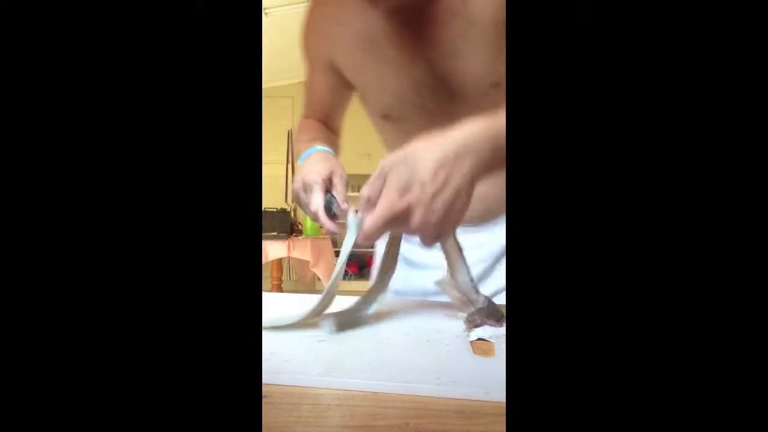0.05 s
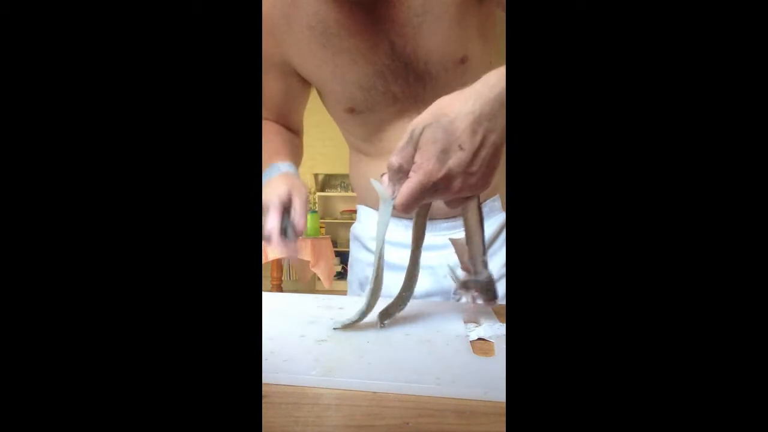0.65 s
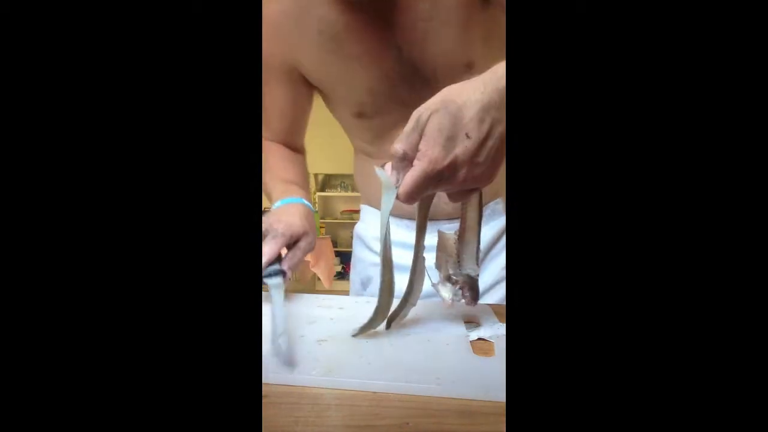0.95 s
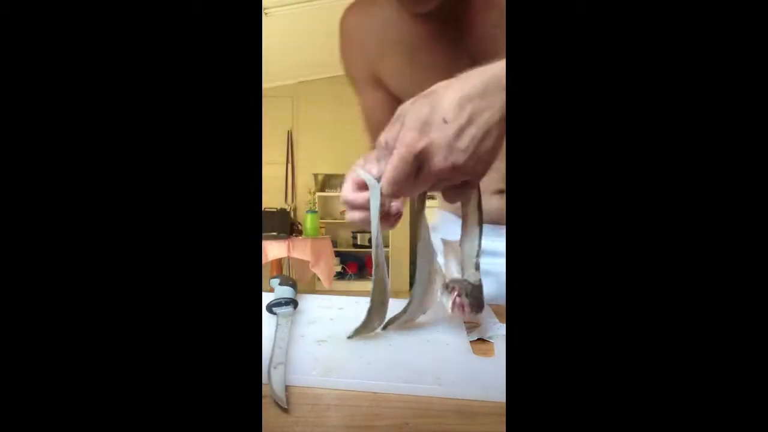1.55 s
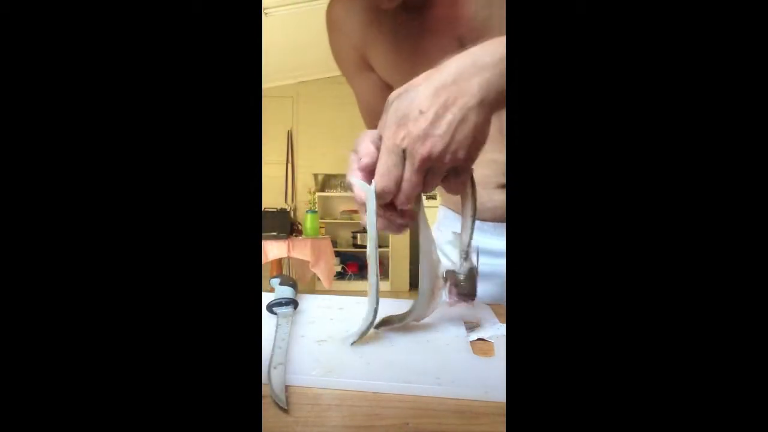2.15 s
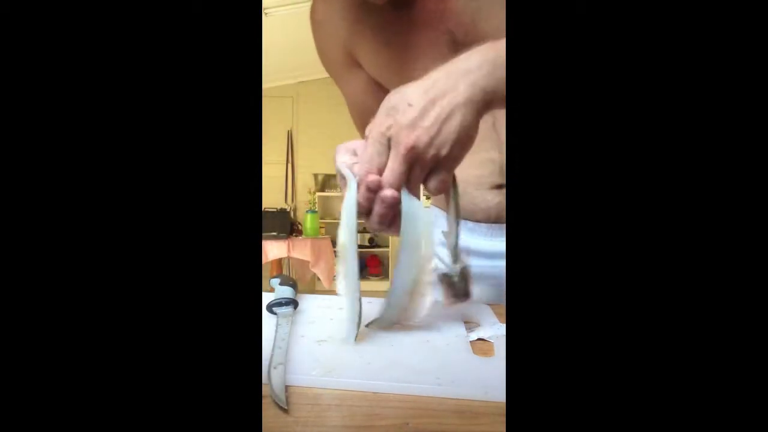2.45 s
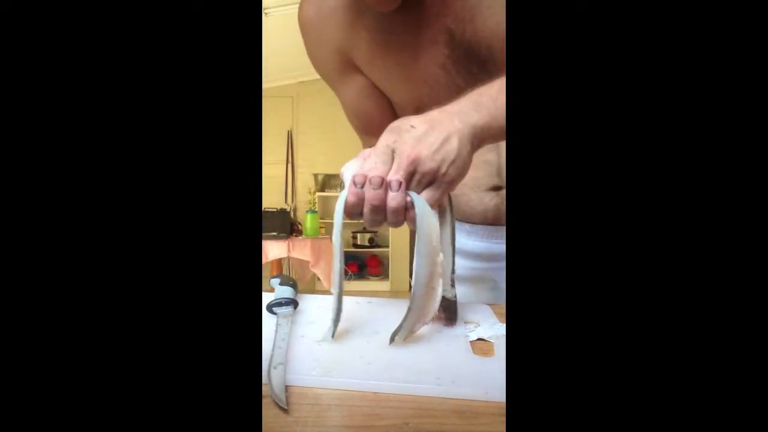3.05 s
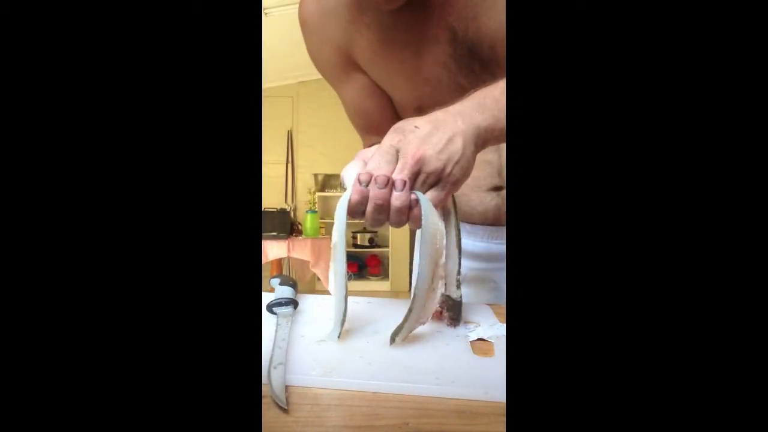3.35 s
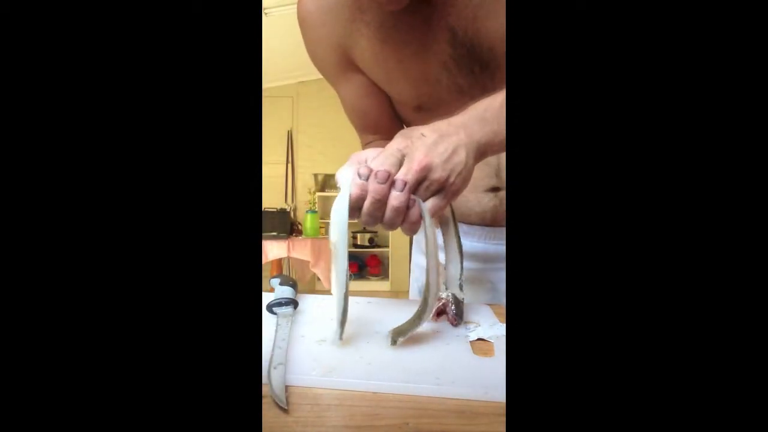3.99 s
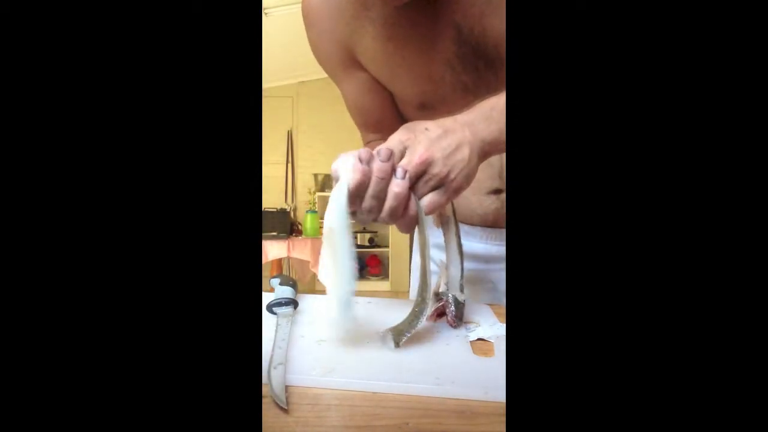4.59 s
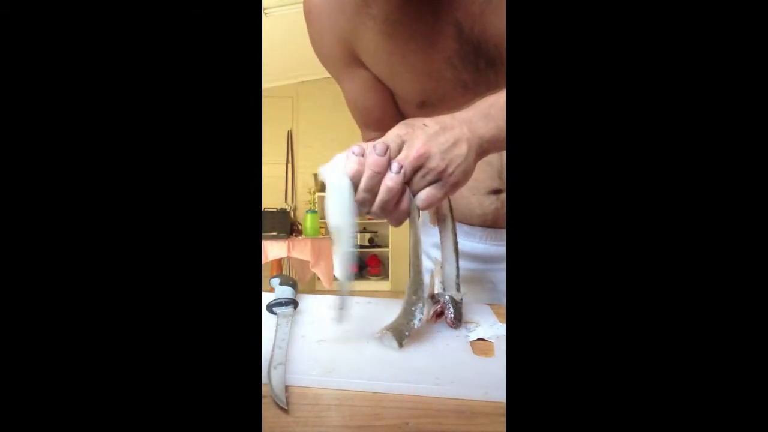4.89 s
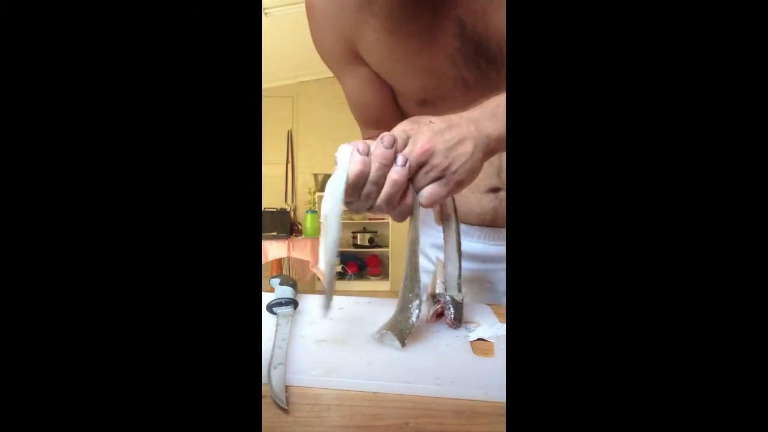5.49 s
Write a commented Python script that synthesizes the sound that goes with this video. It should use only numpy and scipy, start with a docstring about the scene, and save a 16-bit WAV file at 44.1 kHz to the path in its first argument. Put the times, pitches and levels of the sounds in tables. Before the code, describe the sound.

A knife ticks and knocks loudly onto a plastic board, then raw squid peels with soft wet pops over a faint fan hum.

```python
"""A fan hums in a small kitchen as raw squid peels wetly apart over a plastic cutting board.
A knife is laid down: after a few light knocks its blade ticks on the board, then the handle drops
with a loud, chattering knock and a dull thud, and the phone's gain ducks. The hands pull on:
tiny wet films break in a crackle, bigger ones snap, and the air pockets behind them ring."""
import sys
import numpy as np
from scipy import signal
from scipy.fft import rfft, irfft
from scipy.io import wavfile
from scipy.ndimage import uniform_filter1d

SR = 44100
rng = np.random.default_rng(int(sys.argv[2]) if len(sys.argv) > 2 else 0)


def wrap_up_sound(samples):
    """Save the sound to the file named by the first command line argument, as 16-bit audio."""
    columns = np.atleast_2d(samples).T
    # keep every value between -1 and 1, then stretch to whole-number steps
    tamed = np.clip(columns, -1, 1)
    steps = np.round(tamed * 32767).astype(np.int16)
    wavfile.write(sys.argv[1], SR, steps)


N = 248283
T = np.arange(N) / SR
TOP_HZ = 15500


def undb(db):
    """Decibels to gain."""
    return 10 ** (np.asarray(db) / 20)


def unit(x):
    """Scale to rms 1."""
    return x / np.sqrt(np.mean(x ** 2))


def through(x, response):
    """Play a sound through an impulse response."""
    return signal.fftconvolve(x, response)[:N]


def decay(t, t60):
    """Envelope that falls 60 dB in t60."""
    return np.exp(-np.log(1000) * t / t60)


def colour(points, size=4096):
    """Minimum-phase response of unit energy, shaped by an EQ curve of (Hz, dB) points."""
    hz, db = np.transpose(points)
    bins = np.maximum(np.fft.rfftfreq(size, 1 / SR), 1)
    cepstrum = irfft(np.log(undb(np.interp(np.log(bins), np.log(hz), db))))
    cepstrum[1:size // 2] *= 2
    cepstrum[size // 2 + 1:] = 0
    response = irfft(np.exp(rfft(cepstrum)))
    return response / np.linalg.norm(response)


def ring(modes):
    """Unit-energy response of a struck body: damped sines of alternating sign."""
    t = T[:SR // 2]
    response = sum((-1) ** k * undb(db) * decay(t, t60) * np.sin(2 * np.pi * hz * t)
                   for k, (hz, db, t60) in enumerate(modes))
    return response / np.linalg.norm(response)


def add(track, s, sound):
    """Mix a short sound in at time s."""
    start = max(int(s * SR), 0)
    track[start:start + len(sound)] += sound[:N - start]


def drift(rate):
    """Smooth random modulation, rms 1, with `rate` new values a second."""
    hold = int(SR / rate)
    steps = np.repeat(rng.standard_normal(N // hold + 1), hold)
    return unit(uniform_filter1d(uniform_filter1d(steps, hold), hold)[:N])


def crackle(rate, spread_db):
    """Tiny random clicks of uneven size, about `rate` a second, rms 1."""
    sizes = undb(spread_db * np.minimum(rng.exponential(size=N), 4)) * rng.choice([-1, 1], N)
    return unit(sizes * (rng.random(N) < rate / SR))


# Reverb bands of the room: (frequency [Hz], t60 [s], relative level [dB])
ROOM_BANDS = [(119, .4, -5.5), (261, 0.52, 0.5), (553, 0.31, 3.5), (907, 0.37, 2.5), (1527, 0.38, 0.5),
              (3320, 0.41, 4.5), (4910, .38, 1.5), (7430, 0.32, -4.5), (14400, 0.24, 4)]

def kitchen(x, near_db, far_db, near_t60=0.029):
    """Direct sound, quick scatter from table and hands, and the tail of the room."""
    t = T[:SR * 3 // 4]
    hz, t60s, db = np.transpose(ROOM_BANDS)
    log_bins = np.log(np.maximum(np.fft.rfftfreq(len(t), 1 / SR), 1))
    noise = rfft(rng.standard_normal(len(t)))
    tail = 0
    for share, t60, gain in zip(np.eye(len(hz)), t60s, undb(db)):
        band = irfft(noise * np.interp(log_bins, np.log(hz), share), len(t))
        tail = tail + gain * band * decay(t, t60)
    tail *= np.clip(t / 0.01 - .5, 0, 1)  # fades in from 5 to 15 ms
    scatter = rng.standard_normal(len(t)) * decay(t, near_t60) * (t > .0004)
    near = undb(near_db) * scatter / np.linalg.norm(scatter)
    far = undb(far_db) * tail / np.linalg.norm(tail)
    return x + through(x, near + far)


def motor_tone(hz, db, wander_hz):
    """A motor tone that wavers in pitch and level."""
    amplitude = np.sqrt(2) * undb(db + 0.74 * drift(26))
    pitch = hz + wander_hz * drift(40)
    return amplitude * np.sin(2 * np.pi * np.cumsum(pitch) / SR)


def noise_bed(eq, fader, flicker_db):
    """Coloured noise that follows a fader curve and flickers in level."""
    noise = through(rng.standard_normal(N), colour(eq))
    return noise * undb(np.interp(T, *np.transpose(fader)) + flicker_db * drift(14))


# EQ of the fan's low drone and of its airy rush: (frequency [Hz], relative level [dB])
DRONE_EQ = [(18, -45.5), (30, -15), (80, -26), (117, -8.5), (144, -11), (177, 3), (231, -8.5), (328, -4.5),
            (397, -8.5), (509, -14.5), (644, -14.5), (714, -20.5), (1000, -24), (1300, -63.5), (2200, -120)]
RUSH_EQ = [(400, -11), (900, -7), (1500, 0.5), (2000, -4.5), (2600, -2), (3400, -5), (4500, -4.5),
           (6500, -8), (10000, -10.5), (15500, -16)]
# Fader curves of drone and rush: (time [s], level [dB])
DRONE_FADER = [(0, -57.5), (1.15, -57), (1.5, -66.5), (1.85, -59.5), (2.5, -57), (3.3, -56), (4.2, -55),
               (5.6, -55)]
RUSH_FADER = [(0, -56), (.6, -65.5), (1.2, -59.5), (2, -64), (2.5, -64.5), (5.6, -63)]
# The motor's hum: (pitch [Hz], level [dB], wander [Hz])
MOTOR_TONES = [(177, -70.5, 4.5), (1523, -81, 5), (1796, -84, 2.6), (1920, -84.5, 3.2), (2097, -80.5, 3.7),
               (2310, -81.5, 3), (2530, -85.5, 2.8), (2564, -80, 3), (2703, -78.5, 1.8)]
# Its thin, high whine: (pitch [Hz], level [dB])
WHINE_PARTIALS = [(3984, -83), (4129, -75.5), (4175, -94)]
# The phone's noise reduction dulls and blurs the whine at first, then lets it through steady:
# (time [s], trim [dB], wander [Hz])
WHINE_AUTOMATION = [(1.5, -2.5, 50), (2.1, 0, 3.7)]

def fan():
    """The fan lays down a throbbing drone, a soft rush of air and wavering motor tones."""
    drone = noise_bed(DRONE_EQ, DRONE_FADER, flicker_db=1.0)
    rush = noise_bed(RUSH_EQ, RUSH_FADER, flicker_db=.8)
    hum = sum(motor_tone(hz, db, wander) for hz, db, wander in MOTOR_TONES)
    times, trim_db, wander_hz = np.transpose(WHINE_AUTOMATION)
    whine = sum(motor_tone(hz, db + np.interp(T, times, trim_db), np.interp(T, times, wander_hz))
                for hz, db in WHINE_PARTIALS)
    return drone + rush + hum + whine


def pocket(hz, cycles, glide):
    """A small air pocket rings for a few cycles, rising in pitch as it opens."""
    age = T[:SR // 50] * hz / cycles  # 1 when the ring is 60 dB down
    return decay(age, 1) * np.sin(2 * np.pi * cycles * age * (1 + glide * np.minimum(age, 1)))


def opening_pockets(s, length, hz, rise, count=160, spread_octaves=0.064, spread_db=2):
    """A swarm of air pockets of different sizes, densest at the peak of a pull."""
    side, large, sign = rng.random((count, 3)).T
    wait, detune, size = rng.standard_normal((count, 3)).T
    times = s + np.abs(wait) * length / 2 * np.where(side < rise, -rise, 1 - rise)
    pitches = hz * 2 ** (spread_octaves * detune)
    pitches *= np.where(large < .22, 0.688, 1)  # some pockets are larger and ring lower
    gains = np.sign(sign - .5) * undb(spread_db * size)
    out = np.zeros(N)
    for at, pocket_hz, gain in zip(times, pitches, gains):
        if 0 < at < T[-1]:
            add(out, at, gain * pocket(min(pocket_hz, TOP_HZ), cycles=22, glide=.08))
    return out * np.sqrt(length * SR / 2) / np.linalg.norm(out)


CRACKLE_START_S = 3.2  # the faint, fine crackle of the fingers begins
# Bright EQ of breaking wet films: (frequency [Hz], relative level [dB])
WET_EQ = [(300, -44), (1000, -19), (2000, -10.5), (3300, -5), (5600, -7), (7400, -1.5), (11000, -3.5),
          (13500, 1), (15500, -1.5)]
# Cues of flesh peeling or sliding: (peak time [s], length [s], level [dB], pocket pitch [Hz])
PEEL_CUES = [(0.031, 0.11, -51, 8100), (0.139, 0.13, -52, 9100), (0.314, 0.2, -65, 3580),
             (0.816, 0.19, -69, 8500), (2.734, 0.14, -63.5, 3360), (2.904, 0.071, -69, 3440),
             (3.262, 0.03, -70, 12500), (3.507, 0.12, -65, 7000), (3.723, 0.094, -69, 8550),
             (3.912, 0.044, -62, 11000), (4.105, 0.083, -68, 6460), (4.231, 0.064, -61, 12000),
             (4.356, 0.031, -65, 5860), (4.416, 0.088, -67, 3760), (4.463, 0.026, -57, 12900),
             (4.495, 0.035, -51, 7140), (4.531, 0.045, -55.5, 13800), (4.844, 0.047, -67, 7250),
             (4.923, 0.049, -60, 9000), (5.062, 0.11, -60.5, 13400), (5.256, 0.04, -46.5, 7200),
             (5.362, 0.12, -66, 8500), (5.565, 0.089, -61, 7240)]

def squelch(rise=0.45, finger_db=-72.5, growth_db_per_s=2.5, burst_db=2.5):
    """Peeling flesh breaks tiny films; later the fingers add a faint, growing crackle."""
    wet = colour(WET_EQ)
    working_db = finger_db + growth_db_per_s * (T - CRACKLE_START_S) + burst_db * drift(22)
    out = through(crackle(rate=900, spread_db=3.5), wet) * undb(working_db) * (T > CRACKLE_START_S)
    films = through(crackle(rate=1000, spread_db=4), wet)
    for s, length, db, hz in PEEL_CUES:
        # a pull swells for the `rise` share of its length and dies away over the rest
        from_peak = np.maximum((s - T) / rise, (T - s) / (1 - rise))
        pull = np.exp(-(from_peak / length) ** 2)
        pocket_db = 5.5 - 110 * length  # in a quicker pull the air pockets ring louder
        out += undb(db) * (pull * films + undb(pocket_db) * opening_pockets(s, length, hz, rise))
    return kitchen(out, near_db=0.0, far_db=-5.5)


def push(contact_ms):
    """Force of one contact; a softer one lasts longer and sounds duller."""
    shape = np.exp(-1000 * T[:SR // 100] / contact_ms)
    return shape / shape.sum()


def bend(force, travel_s, at_hz=1065):
    """Bending waves smear a blow: treble arrives first, bass last, and at_hz takes travel_s."""
    hz = np.fft.rfftfreq(N, 1 / SR)
    phase = 4 * np.pi * travel_s * np.sqrt(at_hz * hz)
    return irfft(rfft(force) * np.exp(-1j * phase), N)


SKID_S, SKID_DB = 0.0057, -27  # swell time, level against the blow
CHATTER_GAP_S, GAP_SHRINK = .0027, .85  # first gap, ratio of each gap to the last
REBOUND_DB, REBOUND_SOFTER_MS = -9, 0.04  # change in level and contact time per rebound
# Hits on the board, the loudest being the handle's drop: (time [s], level [dB], contact time [ms])
KNOCK_CUES = [(.416, -30, .06), (.429, -26.5, 0.042), (.446, -29, 0.066), (1.181, -25, .15),
              (1.192, -27.5, 0.13), (1.2466, 9.5, 0.0038), (1.2525, -4, 0.36), (1.383, -13.5, 0.11),
              (1.424, -27, 0.35)]
# Body of the knock: (frequency [Hz], relative level [dB])
BOARD_EQ = [(35, -45.5), (75, -32.5), (140, -14), (230, -8), (320, -24.5), (480, 0.5), (560, -6),
            (670, 0.5), (810, -6.5), (1000, -10), (1230, -5.5), (1520, -1), (2400, -6.5), (2980, -7.5),
            (3340, -4.5), (4120, -7.5), (4800, -7), (5600, -10), (6400, -8.5), (7300, -3.5), (8670, -7.5),
            (10500, -12), (14100, -26), (15500, -32.5)]
# Ring of the board on its table: (pitch [Hz], relative level [dB], t60 [s])
BOARD_RING = [(171, -8.5, .2), (225, -6, .25), (492, 4, 0.14), (618, 3.5, 0.27), (659, 6.5, 0.23),
              (828, 2.5, 0.15), (928, 6, .14), (1054, 1, 0.12), (1271, 6, .12), (1350, 2, .12),
              (1527, 4.5, .1), (1770, -0.5, .12), (2010, -1, 0.32), (2220, -6, .16), (2370, 3, 0.13),
              (2495, 0.5, .22), (3342, 0.5, .15)]

def board_knocks():
    """Each blow skids, lands and chatters on the board, which rings."""
    force = np.zeros(N)
    friction = through(rng.standard_normal(N), push(contact_ms=0.14))
    for s, db, contact_ms in KNOCK_CUES:
        force += friction * undb(db + SKID_DB) * np.exp(-np.abs(s - T) / SKID_S) * (T < s)
        for k in range(4):
            add(force, s, undb(db + k * REBOUND_DB) * push(contact_ms + k * REBOUND_SOFTER_MS))
            s += CHATTER_GAP_S * GAP_SHRINK ** k
    force = bend(force, travel_s=0.0009)
    knock = through(force, colour(BOARD_EQ))
    ringing = undb(-14) * through(force, ring(BOARD_RING))
    return kitchen(knock + ringing, near_db=-0.5, far_db=-2.5)


# Ticks of the edge on the board: (time [s], level [dB])
TICK_CUES = [(0.9324, -5), (0.9397, -9), (0.9585, -16), (0.9633, -12)]
# Colour of a tick: (frequency [Hz], relative level [dB])
BLADE_EQ = [(120, -41), (200, -23.5), (358, -29), (505, 3.5), (620, -14), (798, -17), (980, -12.5),
            (1110, 3), (1350, -20.5), (1600, -1.5), (1780, -8.5), (2100, 4), (2380, -2.5), (2940, -5),
            (3400, -9.5), (5600, -10), (7620, -3), (15500, -6.5)]
# Steely ring of the knife: (pitch [Hz], relative level [dB], t60 [s])
BLADE_RING = [(508, -3.5, .13), (1070, -6.5, .09), (1203, -3, 0.098), (2036, -3.5, .12), (2140, -7.5, .12),
              (2300, 2, 0.14), (2476, -4, 0.1), (2900, 0.5, 0.0806), (6500, -1, .11), (6880, 3, .11),
              (7680, 2.5, 0.21), (10640, -2.5, .09), (11500, -5, .1), (13580, -5, .12)]

def blade_ticks(scrape_lead_s=.0016, scrape_db=-43):
    """The steel edge scrapes and bounces on the board: a quick clatter of ticks and a short ring."""
    taps = np.zeros(N)
    for s, db in TICK_CUES:
        add(taps, s, undb([db]))
    sliding = (T > TICK_CUES[0][0] - scrape_lead_s) & (T < TICK_CUES[-1][0])
    scrape = undb(scrape_db) * sliding * crackle(rate=1400, spread_db=4.5)
    force = bend(taps + scrape, travel_s=0.0014)
    ticks = through(force, colour(BLADE_EQ))
    ringing = undb(-14.5) * through(force, ring(BLADE_RING))
    return kitchen(ticks + ringing, near_db=-2.5, far_db=-6.5, near_t60=0.026)


# Foreground wet pops: (time [s], level [dB], pocket pitch [Hz])
POP_CUES = [(1.2235, -41, 9000), (2.3168, -33.5, 12000), (2.5308, -41.5, 2890), (2.627, -44, 8800),
            (2.7052, -47.5, 3290), (2.7187, -38.5, 6500), (2.8055, -49, 3910), (3.03, -48, 12500),
            (3.108, -45, 13000), (3.258, -45, 12500), (3.4053, -44.5, 6500), (3.4435, -42.5, 5000),
            (3.5105, -45, 13000), (3.5303, -45, 5230), (3.6666, -36, 11500), (3.8755, -43, 5700),
            (3.9175, -35.5, 9220), (4.136, -45, 9000), (4.171, -47, 5800), (4.246, -43, 11000),
            (4.2804, -46, 12500), (4.3575, -46.5, 5420), (4.4465, -35, 11000), (4.6222, -48, 4130),
            (4.8074, -48, 5000), (4.826, -45, 12000), (4.8923, -45, 7380), (4.9245, -39.5, 9150),
            (5.0714, -43, 13500), (5.2215, -40, 5600)]
# EQ of the snap, brightest just above the pocket: (multiple of pocket pitch, relative level [dB])
SNAP_EQ = [(.18, -40.5), (.4, -13), (.65, 1.5), (1.6, 7), (2.601, -18), (5.001, -18)]

def pops(snap_db=10.5, pocket_db=4.5):
    """A wet film snaps and the air pocket behind it rings; fainter stray pockets fill in."""
    out = np.zeros(N)
    for s, db, hz in POP_CUES:
        snap = colour([(multiple * hz, gain_db) for multiple, gain_db in SNAP_EQ])
        add(out, s, undb(db + snap_db) * snap)
        add(out, s, undb(db + pocket_db) * pocket(hz, cycles=10, glide=0.4))
    return kitchen(out + stray_pockets(), near_db=0.5, far_db=-6.0)


def stray_pockets(count=60, scatter_s=.06, middle_hz=8500, spread_octaves=.6):
    """Small air pockets open softly in clusters around the later pulls."""
    pulls = [s for s, *_ in PEEL_CUES if s > CRACKLE_START_S]
    out = np.zeros(N)
    for _ in range(count):
        at = rng.choice(pulls) + rng.uniform(-scatter_s, scatter_s)
        hz = middle_hz * 2 ** rng.uniform(-spread_octaves, spread_octaves)
        gain = undb(rng.uniform(-59, -51))
        add(out, min(at, T[-1]), gain * pocket(hz, cycles=22, glide=0.2))
    return out


def scene():
    """Fan, squid, board and knife in mono."""
    return (fan() + squelch() + board_knocks() + blade_ticks() + pops())[None]


def duck(x, threshold_db=-31, quick=0.94, quick_s=0.055, slow=0.19, slow_s=7.5, attack_s=0.058):
    """Loud sound turns the gain down; it comes back quickly at first, then creeps."""
    power = np.maximum(uniform_filter1d(x ** 2, SR // 50), 1e-12)
    over_db = np.maximum(10 * np.log10(power) - threshold_db, 0)
    cut_db = 0
    for share, release_s in ((quick, quick_s), (slow, slow_s)):
        fade = np.exp(-T / release_s)
        cut_db = cut_db + share * fade * np.maximum.accumulate(over_db / fade)  # decaying peak hold
    pole = np.exp(-1 / (attack_s * SR))
    return x * undb(-signal.lfilter([1 - pole], [1, -pole], cut_db))


def record(dry, ceiling=0.64, low_cut_hz=90):
    """The phone rides its gain, rounds the loudest peak and cuts rumble and top."""
    rounded = ceiling * np.tanh(duck(dry[0]) / ceiling)
    low_cut = signal.butter(2, low_cut_hz, "high", fs=SR, output="sos")
    high_cut = signal.ellip(10, .1, 80, TOP_HZ, fs=SR, output="sos")
    return signal.sosfilt(high_cut, signal.sosfilt(low_cut, rounded))[None]


dry = scene()
out = record(dry)
wrap_up_sound(out)
```